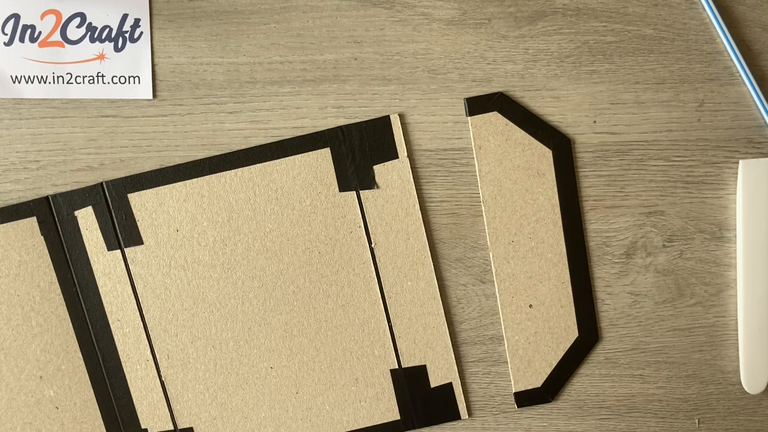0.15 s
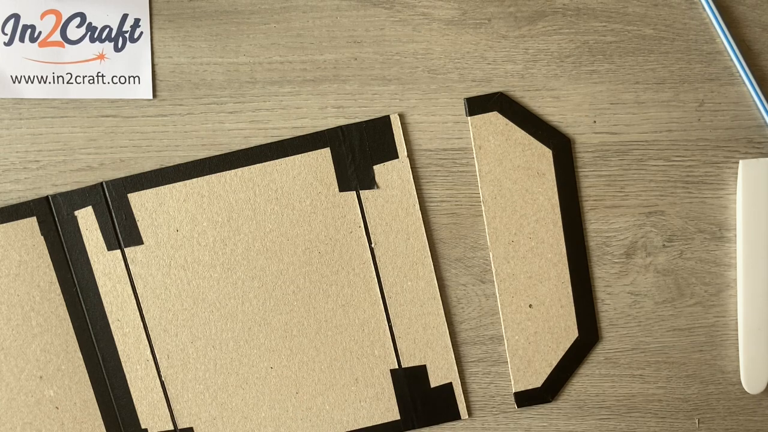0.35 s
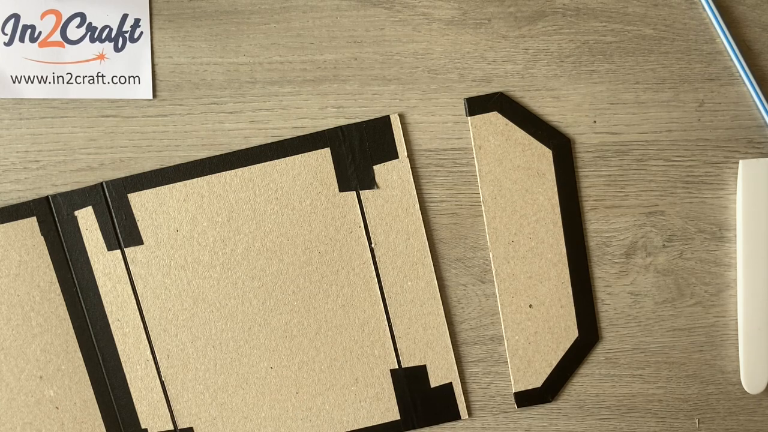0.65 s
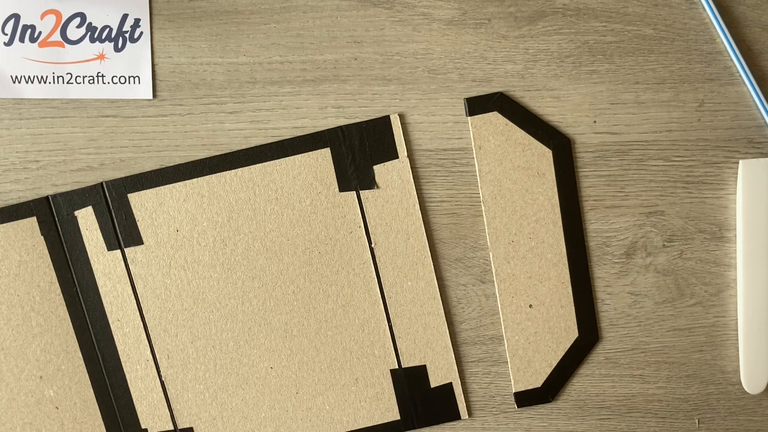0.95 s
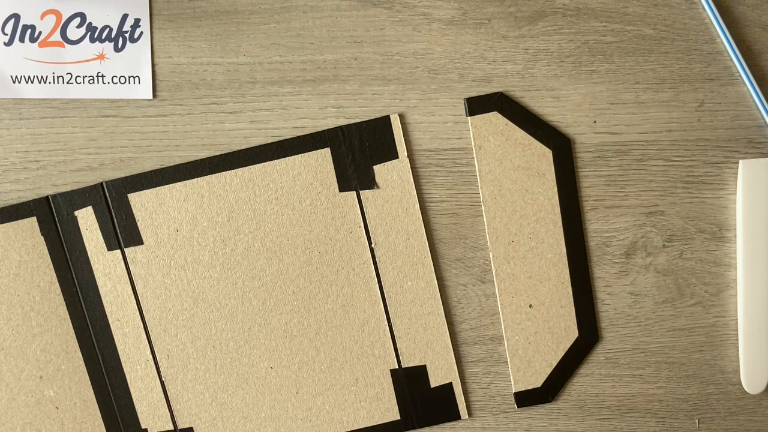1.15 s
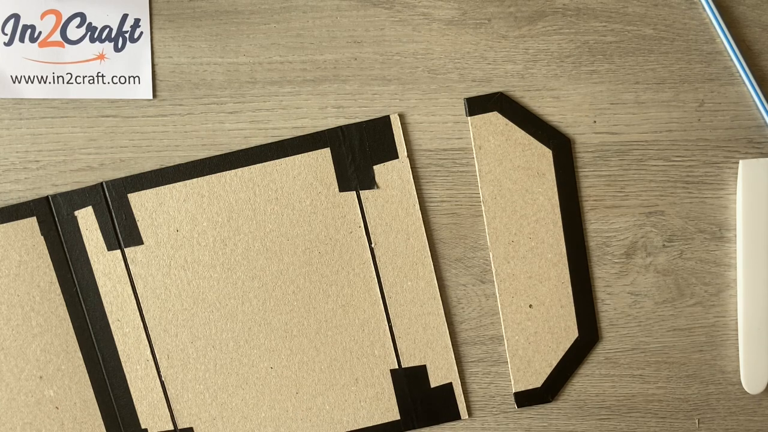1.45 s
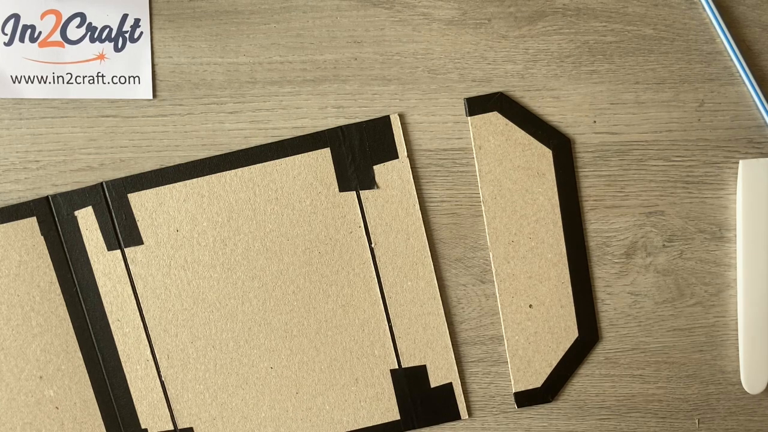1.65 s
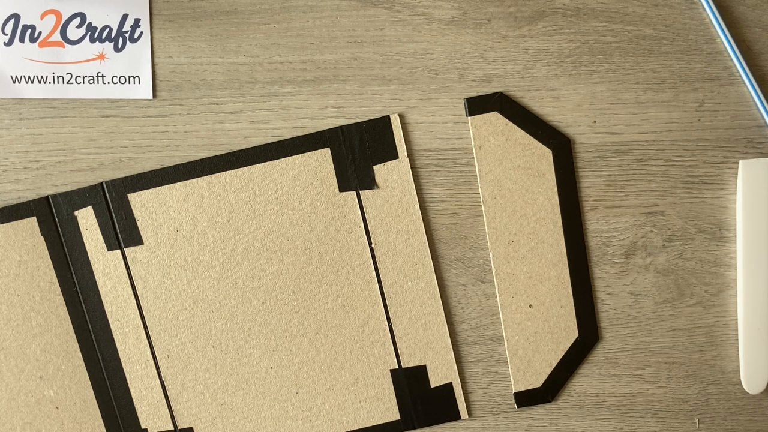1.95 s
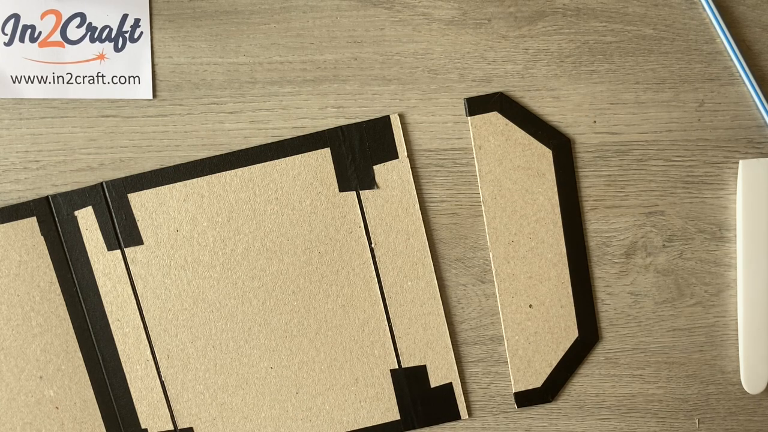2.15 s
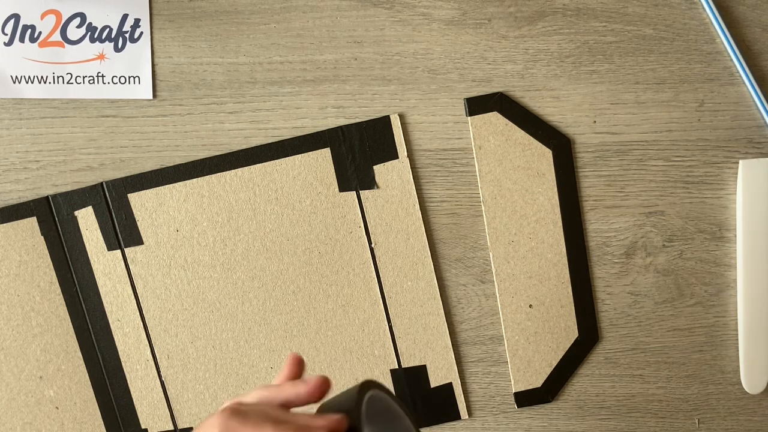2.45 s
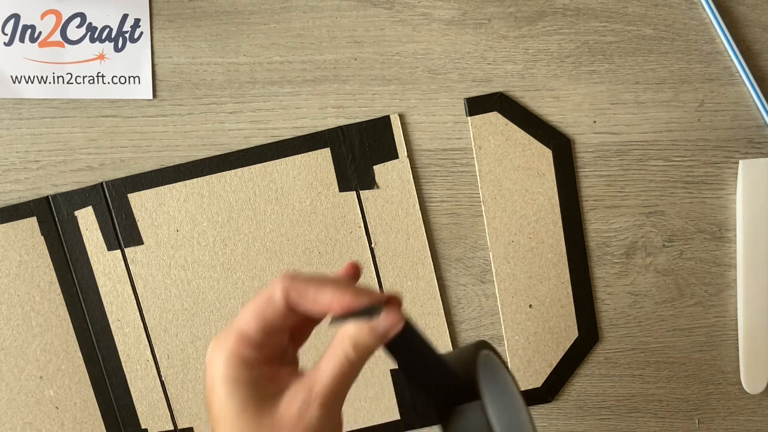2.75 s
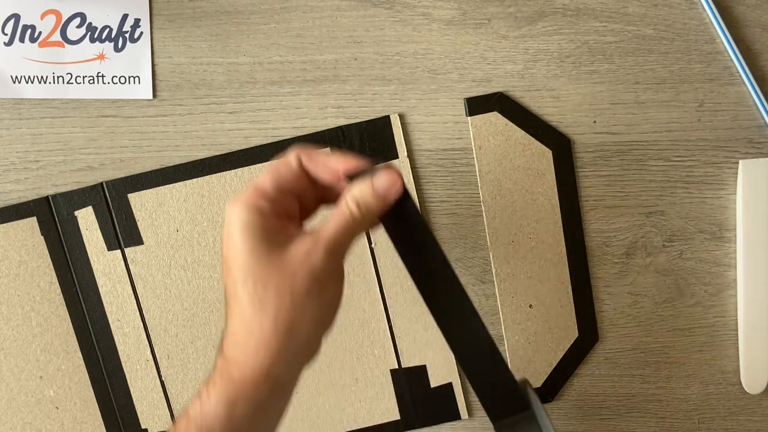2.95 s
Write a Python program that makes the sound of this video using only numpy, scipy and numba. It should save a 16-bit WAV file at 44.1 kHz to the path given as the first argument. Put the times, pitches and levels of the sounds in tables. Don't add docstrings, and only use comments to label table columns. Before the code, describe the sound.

Adhesive tape is picked with a fingernail, then peeled off its roll in crackling, falling-pitched rips.

```python
import sys
import numpy as np
from scipy import signal
from scipy.fft import rfft, irfft, next_fast_len
from scipy.io import wavfile
from scipy.ndimage import uniform_filter1d, map_coordinates
from numba import njit

SR = 44100
rng = np.random.default_rng(int(sys.argv[2]) if len(sys.argv) > 2 else 0)


def linear_from_db(decibels):
    return 10 ** (np.asarray(decibels, float) / 20)


def generate_wav(sig):
    pcm = np.round(np.clip(np.atleast_2d(sig).T, -1, 1) * 32767).astype(np.int16)
    wavfile.write(sys.argv[1], SR, pcm)


N = 136710

# (time [s], crackle level [dB])
PEEL_MOVEMENTS = [
    [(0.0, -66), (0.012, -67), (0.03, -86), (0.044, -76), (0.062, -101), (0.07, -95)],
    [(0.47, -91), (0.6, -76.5), (0.67, -68), (0.69, -62.5), (0.73, -58.5), (0.762, -57), (0.775, -69),
     (0.82, -80)],
    [(1.07, -102), (1.088, -101), (1.106, -106), (1.118, -75), (1.15, -108)],
    [(1.25, -100), (1.286, -62.5), (1.378, -41.5), (1.468, -41), (1.514, -49), (1.6, -84)],
    [(1.6, -72), (1.63, -84), (1.64, -68), (1.764, -99), (1.862, -76), (1.93, -99)],
    [(1.99, -85), (2.016, -77), (2.088, -83), (2.126, -44.5), (2.134, -74), (2.26, -96)],
    [(2.37, -88), (2.416, -71.5), (2.434, -50.5), (2.488, -51.5), (2.57, -36.5)],
    [(2.57, -36.5), (2.77, -34), (2.92, -28), (2.932, -27.5), (3.0, -30), (3.018, -26.5), (3.032, -28.5),
     (3.044, -25.5), (3.1, -32.5)],
]
MOVEMENT_TREBLE = [2, 11.5, -4, 5, 8, 7.5, 5, 3]
# (frequency [Hz], level [dB])
CRACKLE_COLOUR = [(1000, -32), (3600, -23), (5500, -6), (9000, -3), (12500, -8), (14500, -10.5),
                  (15800, -13.5), (16100, -40)]
# (time [s], pitch [Hz], lowest mode over the others [dB], ringing level [dB])
SHORT_PULL = [
    (1.37, 4320, -6, -64),
    (1.405, 4100, -3, -48),
    (1.428, 3640, -1.5, -44),
    (1.446, 2380, 0, -42),
    (1.463, 1850, 3.5, -44),
    (1.49, 1610, 2.5, -49),
    (1.515, 1200, 3.5, -50),
    (1.58, 1050, -8, -66),
]
# (time [s], pitch [Hz], lowest mode over the others [dB], ringing level [dB])
LONG_PULL = [
    (2.52, 1900, -10.5, -59),
    (2.575, 1700, 3, -38),
    (2.61, 1500, 2.5, -40.5),
    (2.65, 980, -7, -39),
    (2.72, 714, -4.5, -41.5),
    (2.82, 500, 7, -37),
    (2.885, 401, 5, -36),
    (2.944, 323, 1, -33),
    (3.1, 186.7, -10, -34),
]
# (time [s], boost [dB], fade [s])
TUGS = [
    (2.57, 3, .01),
    (2.674, 4, .015),
    (2.735, 4, .006),
    (2.926, 7, .045),
    (2.957, 3, .012),
    (3.012, 9, .008),
    (3.04, 2, .01),
]
STRIP_MODES = [1, 1.6, 2, 3, 4, 5.2, 7, 10]
STRIP_MODE_LEVELS = [0, -11, -16, -12, -14, -16, -18, -18]
# (frequency [Hz], level [dB])
STRIP_RADIATION = [(60, -15), (240, -12.5), (450, -2), (1000, 0.5), (1700, -0.5), (2800, 0), (4400, -1.5),
                   (7000, -16.5)]
# (frequency [Hz], width [Hz], share [ratio])
DESK_DIP = (3400, 350, .6)
# (time [s], peak [dB])
TICKS = [(0.4867, -61), (0.4898, -72), (0.4956, -69), (0.5014, -65), (0.5069, -58), (0.5145, -46.5),
         (0.5223, -58), (0.5284, -56), (0.532, -48), (0.536, -44), (0.5478, -53), (0.5523, -57),
         (0.5682, -58), (0.5767, -46), (0.5918, -64), (0.5953, -55), (0.5986, -64), (0.6046, -49),
         (0.6104, -40), (0.617, -51), (0.622, -57), (0.6318, -63), (0.6392, -53), (0.6438, -53),
         (0.6486, -49), (0.6598, -58), (0.6664, -45), (0.6727, -49), (0.682, -39.5), (0.692, -45),
         (0.6973, -46), (0.7084, -34), (0.7223, -44), (0.7434, -51), (0.7543, -54), (0.7621, -44),
         (0.7846, -42.5), (0.8021, -58)]
# (frequency [Hz], level [dB])
TICK_COLOUR = [(3000, -44), (5500, -15), (8000, -7), (11000, 5.5), (14000, 3.5), (15800, -1), (16100, -32)]
# (time [s], peak [dB], length [s], body under it [dB])
SNAPS = [(0.572, -51, 0.0065, -21), (0.684, -44, 0.003, -21), (0.8209, -33, 0.0052, -10),
         (1.272, -56, 0.0028, -9), (1.286, -45, 0.0041, -34), (1.296, -47, 0.0053, -12),
         (1.61, -59, 0.0034, -10), (1.632, -46, 0.0056, -22), (1.643, -42.5, 0.0026, -11.5),
         (1.6666, -44, 0.0026, -7), (1.7814, -68, 0.004, -10), (1.948, -52, 0.0027, 0),
         (2, -56, 0.004, -21), (2.02, -42.5, 0.0026, -17), (2.061, -49.5, 0.0022, -22),
         (2.11, -46, 0.0071, -8), (2.1193, -26.5, 0.0033, -12), (2.1254, -29, 0.0018, -6),
         (2.135, -45.5, 0.0046, -0.5), (2.194, -67.5, 0.0025, 18.5), (2.389, -56, 0.0088, -20),
         (2.291, -57.5, 0.0029, 8), (2.433, -33, 0.0017, -26), (2.479, -29.5, 0.0026, -25),
         (2.4823, -24, 0.0016, -23), (2.5056, -29, 0.0035, -21)]
# (frequency [Hz], width [Hz], level [dB])
ROLL_CORE = [(905, 130, 15), (1900, 1500, 13.5), (3000, 900, -40)]
# (frequency [Hz], width [Hz], gain [ratio])
ROLL_RIM = (8450, 340, 1.12)
# (time [s], level [dB], low mode [Hz], 60 dB decay [s])
KNOCKS = [
    (1.602, -56, 282, .08),
    (1.863, -55.5, 241, .07),
    (2.197, -40, 503, .032),
    (2.644, -46.5, 130.5, 0.12),
    (2.656, -53, 72, 0.14),
    (2.75, -58, 55, 0.12),
]
# (frequency [Hz], likeness [ratio])
TAPE_ALIKE = [(300, .96), (800, .82), (2000, .68), (3500, .68), (4900, .74), (6500, .77), (8000, .92)]
# (frequency [Hz], right over left [dB])
RIGHTWARD = [(150, 0), (400, 4.5), (3000, 4.5), (4700, 0)]
# (frequency [Hz], phase [half turns])
LEFT_LEAD = [(0, 0), (2000, .2), (3000, .33), (5420, 1), (8450, 2), (11750, 3), (14700, 4)]
# (frequency [Hz], level [dB rms])
HUM = [(100, -68.5), (150, -81), (200, -63), (300, -63.5), (400, -73), (450, -80), (600, -83.5), (700, -75),
       (750, -79), (800, -78.5), (1150, -82.5), (1350, -80), (1470, -75.5)]
# (frequency [Hz], level [dB rms])
MOTOR = (94.7, -77)
# (frequency [Hz], level [dB])
FAN_COLOUR = [(25, -18), (100, 3.5), (300, -3), (2200, -1.5), (3500, -9), (6000, -26), (9000, -31),
              (16000, -36)]
# (frequency [Hz], likeness [ratio])
FAN_ALIKE = [(60, 0.16), (200, 0.2), (500, 0.022), (3500, 0.03), (5000, 0.61)]

TOP_HZ = 15900
MOTTLE_DB = 2.5
WIDTH_AT_500_HZ, WIDTH_GROWS, NARROWEST_HZ = 45, 2.3, 22
TUG_ON_LOWEST = 0.26
BROKEN_DB, WAVER = 3, .012
CORE_HZ, CORE_DB, CORE_OCTAVES, CORE_TUG = 960, 5, .4, 1.1
TICK_DB, TICK_S = 7.5, .0003
UPPER_MODE, UPPER_DB = 1.57, -1.5
ROOM_DB, ROOM_T60_S = -13.5, 0.32
FAN_DB = -61.5
WEAK_MID_DB, WEAK_SIDE_DB = 7.8, 6


def tape():
    short = strip(SHORT_PULL, loose=.8, rasp_db=6, rasp_from_hz=950)
    long = strip(LONG_PULL, loose=.6, rasp_db=6.5, rasp_from_hz=330)
    near = peel() + short + long + snaps() + ticks() + knocks()
    return near + room(near)


def peel():
    clumps = linear_from_db(2 + 1.42 * wobble(45) + 0.9 * wobble(200))
    crackle = mottled(grit(9000, spread_db=1.8, smooth=1.3))
    crackle = unit(filtered(crackle, lambda hz: linear_from_db(along(CRACKLE_COLOUR, hz))))
    fine = filtered(crackle, lambda hz: 1 / (1 + (11500 / (hz + 1)) ** 8))
    glue = np.zeros(N)
    for rows, treble_db in zip(PEEL_MOVEMENTS, MOVEMENT_TREBLE):
        glue += gain(rows) * (crackle + (linear_from_db(treble_db) - 1) * fine)
    return filtered(clumps * glue, lambda hz: (hz < TOP_HZ) * hz / (hz + 800))


def strip(pull, loose, rasp_db, rasp_from_hz):
    t = np.arange(N) / SR
    s, hz, lowest_db, _ = np.transpose(pull)
    span = (t > s[0]) & (t < s[-1])
    pitch = np.exp(np.interp(t, s, np.log(hz)) + WAVER * wobble(40))[span]
    tugs_db = sum(db * (t > at) * np.exp(-np.abs(t - at) / fade) for at, db, fade in TUGS)
    shake = grit(5000, spread_db=1.8, smooth=.8) * linear_from_db(1.38 * wobble(60) + tugs_db)
    ring = filtered(linear_from_db(rasp_db) * mottled(shake), lambda f: 1 / (1 + (rasp_from_hz / (f + 1)) ** 4))
    damping_hz = NARROWEST_HZ + loose * WIDTH_AT_500_HZ * (pitch / 500) ** WIDTH_GROWS
    for k, db in zip(STRIP_MODES, STRIP_MODE_LEVELS):
        width = np.minimum(k ** np.where(k > 4, 1.3, .7) * damping_hz, min(1000 * k, 2500))
        keep = np.exp(-1.5 * np.pi * width / SR)
        if k > 1:
            feed_db = BROKEN_DB * wobble(30.18)
        else:
            feed_db = np.interp(t, s, lowest_db) - (1 - TUG_ON_LOWEST) * tugs_db
        turn = np.exp(2j * np.pi * k * np.cumsum(pitch) / SR)
        fed = (shake * linear_from_db(feed_db))[span] / turn
        mode = ringing(ringing(fed, keep), keep) * turn
        near_core = np.exp(-(np.log2(k * pitch / CORE_HZ) / CORE_OCTAVES) ** 2)
        core_db = (k > 2) * (CORE_DB + CORE_TUG * tugs_db[span]) * near_core
        ring[span] += linear_from_db(db + core_db) * (k * pitch < 9000) * np.sqrt(SR / width) * mode.real

    def radiated(f):
        return linear_from_db(along(STRIP_RADIATION, f)) * (1 - bump(f, *DESK_DIP)) * (f < TOP_HZ)

    return filtered(gain(pull) * ring, radiated)


def snaps():
    bright, body = np.zeros(N), np.zeros(N)
    t = np.arange(SR // 20) / SR
    for s, db, length, body_db in SNAPS:
        shape = np.exp(-(t / max(length, .001)) ** 2) * (1 - np.exp(-t / 0.0007))
        burst = linear_from_db(db - 2.0) * shape * rng.standard_normal(len(t))
        bright[round(s * SR):][:len(t)] += burst
        body[round(s * SR):][:len(t)] += linear_from_db(body_db - 5.0) * burst

    def core(f):
        total = 0
        for k, (centre, width, db) in enumerate(ROLL_CORE):
            damping = 1j * f * width
            total = total + (-1) ** k * linear_from_db(db) * damping / (centre * centre - f * f + damping)
        return total

    rim = filtered(bright, lambda hz: linear_from_db(along(CRACKLE_COLOUR, hz)) * (1 + bump(hz, *ROLL_RIM)))
    return rim + filtered(body, core)


def ticks():
    out, t = np.zeros(N), np.arange(SR // 200) / SR
    draws = rng.standard_normal((len(TICKS), len(t))) * np.exp(-t / TICK_S)
    for (s, db), click in zip(TICKS, draws):
        out[round(s * SR):][:len(t)] += linear_from_db(db + TICK_DB) * click / np.abs(click).max()
    return filtered(out, lambda hz: linear_from_db(along(TICK_COLOUR, hz)))


def knocks():
    out, t = np.zeros(N), np.arange(SR // 5) / SR
    for s, db, hz, t60 in KNOCKS:
        modes = np.sin(2 * np.pi * hz * t) + linear_from_db(UPPER_DB) * np.sin(2 * np.pi * UPPER_MODE * hz * t)
        out[round(s * SR):][:len(t)] += linear_from_db(db - 60 * t / t60) * (1 - np.exp(-t * hz / 0.48)) * modes
    return out


def grit(per_s, spread_db, smooth):
    snapping = rng.random(N) < per_s / SR
    threads = snapping * linear_from_db(spread_db * rng.exponential(size=N)) * rng.standard_normal(N)
    return unit(unit(threads) + smooth * rng.standard_normal(N))


def mottled(x):
    z = signal.stft(x, nperseg=256)[2]
    patches = uniform_filter1d(uniform_filter1d(rng.standard_normal(z.shape), 6, 0), 5, 1)
    return signal.istft(z * linear_from_db(MOTTLE_DB * unit(patches)), nperseg=256)[1][:N]


@njit
def ringing(x, keep):
    out, last = np.empty_like(x), 0j
    for i in range(len(x)):
        last = keep[i] * last + (1 - keep[i]) * x[i]
        out[i] = last
    return out


def room(x):
    t = np.arange(SR // 3) / SR
    tail = rng.standard_normal(len(t)) * linear_from_db(-60 * t / ROOM_T60_S)
    return linear_from_db(ROOM_DB) * signal.fftconvolve(np.pad(x, (150, 0)), tail / np.linalg.norm(tail))[:N]


def background():
    t = np.arange(N) / SR
    hum = np.zeros(N)
    for hz, db in [*HUM, MOTOR]:
        hum += linear_from_db(db + 1.5 + 1.55 * wobble(4.3)) * np.sin(2 * np.pi * (hz * t + rng.random()))
    rush = filtered(rng.standard_normal((2, N)), lambda hz: linear_from_db(along(FAN_COLOUR, hz)))
    rush = linear_from_db(FAN_DB) * unit(rush)
    return hum * linear_from_db([[-.4], [.4]]) + ports(*rush, FAN_ALIKE, [(100, 0.0044)])


def ports(x, other, alike, rightward):
    side = np.array([[1], [-1]])

    def angle(hz):
        return np.arccos(np.clip(along(alike, hz), 0, 1)) / 2

    def place(hz):
        lead = np.exp(.5j * np.pi * side * np.interp(hz, *np.transpose(LEFT_LEAD)))
        return lead * linear_from_db(-side * along(rightward, hz) / 2)

    shared = filtered(x, lambda hz: np.cos(angle(hz)) * place(hz))
    return shared + filtered(other, lambda hz: side * np.sin(angle(hz)) * place(hz))


def drop_weak_bands(x):
    hz, _, z = signal.stft(np.array([x[0] + x[1], x[0] - x[1]]) / 2, SR, nperseg=2048)
    starts = np.r_[0, np.arange(128, 320, 16), np.arange(320, len(hz), 32)]
    power = np.add.reduceat(np.abs(z) ** 2, starts, axis=1)
    kept = power * linear_from_db([[[2 * WEAK_MID_DB]], [[2 * WEAK_SIDE_DB]]]) > power[::-1]
    kept[:, 0] = True
    kept = np.repeat(kept, np.diff(np.r_[starts, len(hz)]), axis=1)
    mid, side = signal.istft(z * kept, SR, nperseg=2048)[1][:, :N]
    return np.array([mid + side, mid - side])


def unit(x):
    return x / np.sqrt(np.mean(x ** 2) + 1e-20)


def along(points, hz):
    f, v = np.transpose(points)
    return np.interp(np.log(hz + 1), np.log(f + 1), v)


def wobble(rate):
    return map_coordinates(rng.standard_normal(int(N * rate / SR) + 4), [np.arange(N) * rate / SR])


def filtered(x, response):
    m = next_fast_len(N + SR // 2)
    return irfft(rfft(x, m) * response(np.fft.rfftfreq(m, 1 / SR)), m)[..., :N]


def gain(rows):
    rows = np.array(rows)
    return linear_from_db(np.interp(np.arange(N) / SR, rows[:, 0], rows[:, -1], left=-140, right=-140))


def bump(hz, centre_hz, width_hz, size):
    return size * np.exp(-((hz - centre_hz) / width_hz) ** 2)


def scene():
    near = tape()
    t = np.arange(SR // 8) / SR
    scatter = rng.standard_normal(len(t)) * linear_from_db(-60 * t / .12)
    reflected = signal.fftconvolve(near, scatter / np.linalg.norm(scatter))[:N]
    return ports(near, reflected, TAPE_ALIKE, RIGHTWARD) + background()


def band_limit(x):
    return signal.sosfilt(signal.butter(12, 16350, fs=SR, output="sos"), x)


def record(dry):
    mix = drop_weak_bands(dry)
    return band_limit(mix)


dry = scene()
out = record(dry)
generate_wav(out)
```